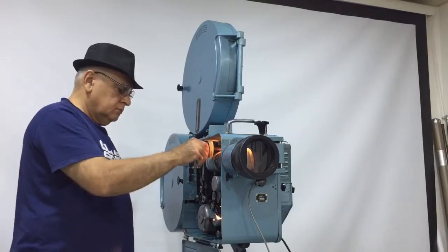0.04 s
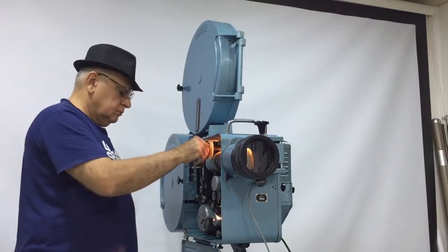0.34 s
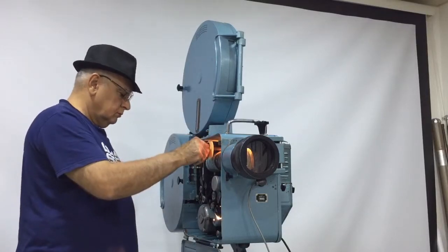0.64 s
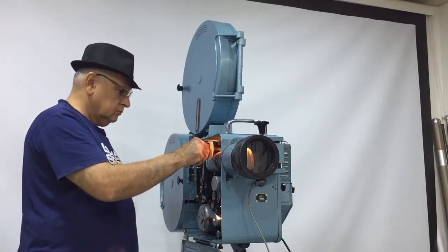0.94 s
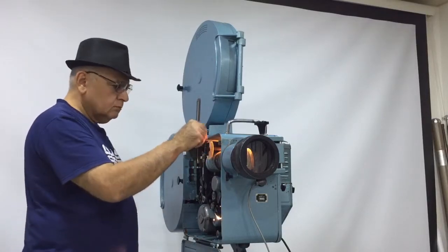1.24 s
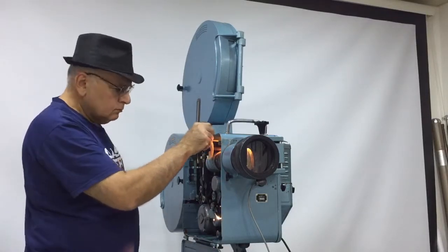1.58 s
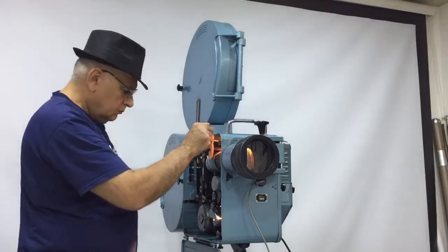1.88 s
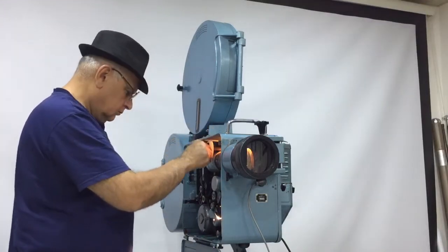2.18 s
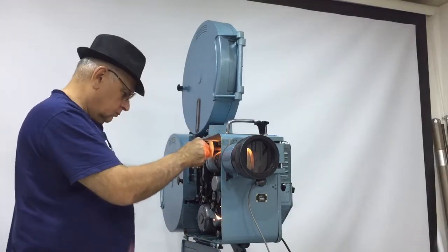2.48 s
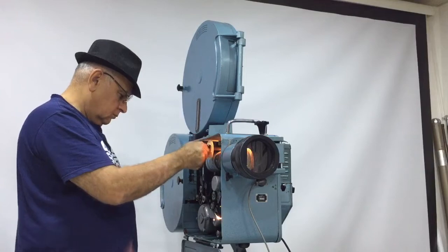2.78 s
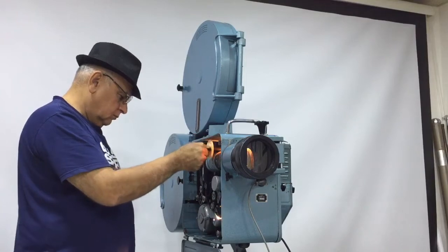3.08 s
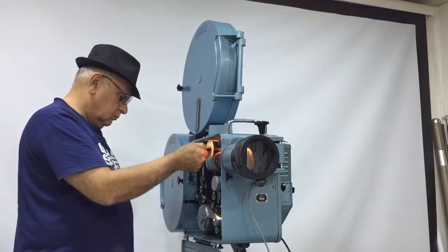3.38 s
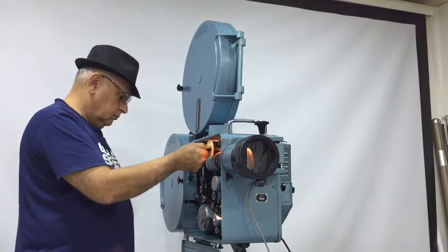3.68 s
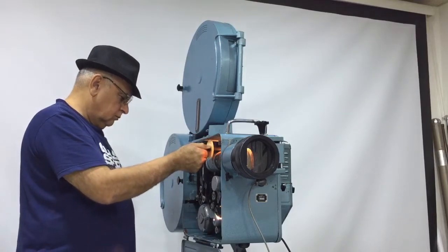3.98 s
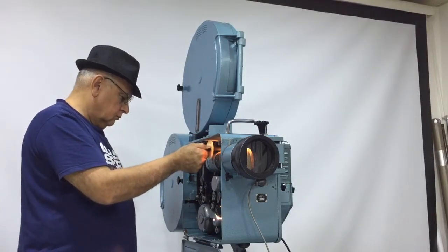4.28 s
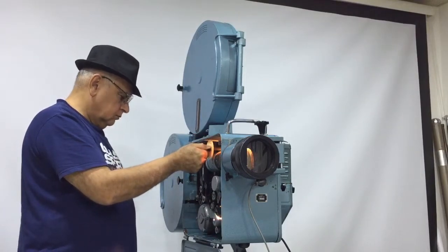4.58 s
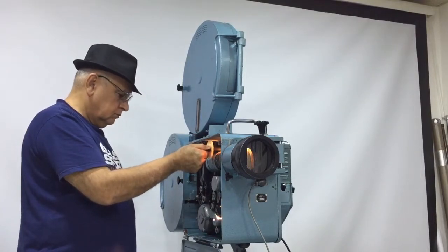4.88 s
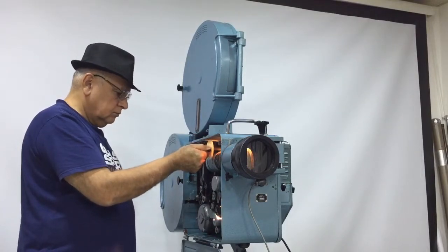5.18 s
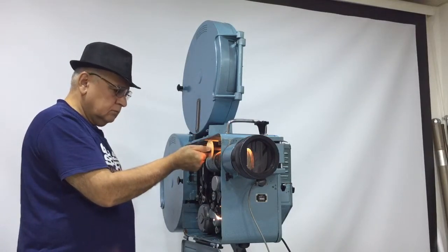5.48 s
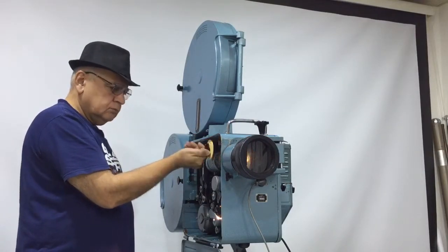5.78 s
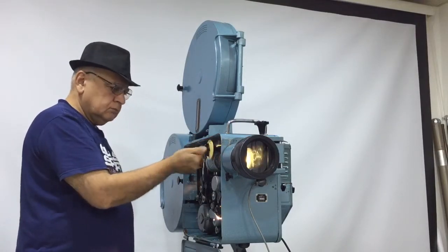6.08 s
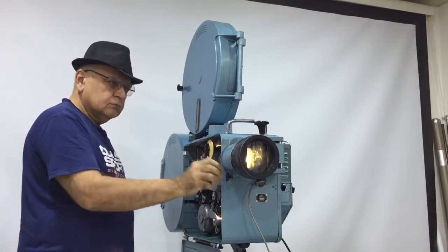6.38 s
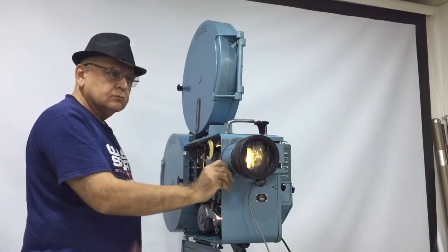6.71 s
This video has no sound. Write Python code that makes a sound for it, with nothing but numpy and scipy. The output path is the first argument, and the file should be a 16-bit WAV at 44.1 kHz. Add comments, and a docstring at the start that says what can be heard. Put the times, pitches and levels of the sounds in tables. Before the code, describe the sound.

A small hall is quiet, with faint electrical hum and a soft bump on the floor. About three seconds in, a large film projector switches on with a clunk and rattling metal covers. Its motor growls upward, the film snaps taut, and it settles into a steady gear whirr, rapid clatter and fan drone, heard from nearby. A lever scrapes and clicks as it runs.

```python
"""A soft bump on the floor sounds over the still air and faint mains hum of a small hall.
A large film projector is switched on: the impact rings its spring, the covers rattle, the stand booms.
The motor growls up to about 24 frames a second and the slack film snaps taut. Periodic impacts make the
running sound: gear teeth whirr and a claw pulls the film down once a frame, while the fan's blade tone
drones in its duct. A hand works a lever, which clicks and scrapes by friction along its guide."""
import sys
import numpy as np
from scipy import signal
from scipy.fft import rfft, irfft
from scipy.io import wavfile
from scipy.ndimage import uniform_filter1d

SR = 44100
rng = np.random.default_rng(int(sys.argv[2]) if len(sys.argv) > 2 else 0)


def transcribe(u):
    """Save the signal u as a 16-bit wav file named by the first command-line argument.

    u: samples, shape (n,) or (channels, n), limited to [-1, 1]; the rate is SR.
    q: integer samples, one column per channel.
    """
    v = np.clip(np.atleast_2d(u).T, -1, 1)
    q = np.round(v * 32767).astype(np.int16)
    wavfile.write(sys.argv[1], SR, q)


N = 302085
T = np.arange(N) / SR

# spectra of noises and struck bodies: frequency_hz, gain_db
AIR_SPECTRUM = [(18, -60), (30, -7), (103, -6.5), (153, -11), (280, -16), (404, -15.5), (844, -22),
                (988, -19.5), (1540, -23.5), (3580, -26.5), (10200, -34), (14800, -36.5), (16000, -51)]
FLOOR_SPECTRUM = [(30, -18), (50, 10.5), (65, -12), (90, 6), (130, 5.5), (200, 1.5), (280, -23), (420, -23),
                  (900, -50)]
SCRAPE_SPECTRUM = [(300, -24), (1000, 7), (1700, 2), (3200, 1), (4300, -0.5), (5200, -8.5), (8000, -16.5),
                   (16000, -52)]
LEVER_SPECTRUM = [(300, -6), (800, 3), (1500, -3), (2600, 5), (3500, 0), (4500, 2), (5400, -7), (7000, -6),
                  (10000, -13), (12500, -10), (16000, -12)]
SWITCH_SPECTRUM = [(200, -27), (700, -2), (1500, -0.5), (2800, -6), (3900, -3), (4450, -1), (4750, 6.5),
                   (5100, -6), (5500, -3), (6300, -8), (7500, -7), (11000, -12), (16000, -20)]
HOUSING_SPECTRUM = [(90, -10), (190, -2), (330, -0.5), (420, 1.5), (790, 4.5), (1000, 1), (1130, -5.5),
                    (1460, 5.5), (1800, -0.5), (2080, 3), (2470, -16), (2850, -11), (3220, -4.5),
                    (3640, -16), (4400, -13), (4800, -12), (6000, -19.5), (14000, -42)]
FILM_SPECTRUM = [(500, -19), (1500, -3), (2500, -1.5), (3300, -1), (4200, -2.5), (5000, -7.5), (5800, -1.5),
                 (7000, -6), (7800, -10.5), (8800, -9.5), (10300, -18), (11500, -13), (14000, -24),
                 (16000, -30)]
TEETH_SPECTRUM = [(150, -22.5), (400, -8), (530, -4.5), (572, -6.5), (610, 1.5), (680, 1), (745, -6.5),
                  (790, -0.5), (1080, -1.5), (1200, -6), (1550, -3.5), (1900, -15.5), (2500, -16),
                  (4000, -44.5)]
BEARING_SPECTRUM = [(60, -41), (130, -25.5), (200, -7.5), (245, -11.5), (300, 3), (360, -10), (470, -11),
                    (630, -1.5), (780, -5), (1050, -1), (1200, -10), (1500, -6), (2000, -12.5),
                    (4000, -33.5)]
GEARBOX_SPECTRUM = [(300, -34), (520, -6.5), (572, -8), (605, -2.5), (660, 2), (720, -3.5), (850, -24),
                    (1600, -39)]
SNAP_SPECTRUM = [(80, -22), (200, -3), (310, -18), (410, -1.5), (520, -4.5), (900, -9.5), (1800, -4),
                 (2300, -1.5), (2650, 2), (2950, -4.5), (3400, -1.5), (4150, -4), (4500, -5), (5300, -10.5),
                 (5900, -9), (6600, -8), (7100, -5.5), (7550, -12), (7900, -11), (9200, -13.5),
                 (10200, -20), (11500, -15), (16000, -23)]

# impacts: start_s, level_db, t60_s
STAND_JOLTS = [(.34, -45.5, 0.73), (2.93, -41, 0.83), (3.19, -39, 0.74), (3.63, -41.5, 0.51)]
FINGER_TOUCHES = [(1.4824, -61, .01), (2.2013, -64, 0.18), (2.255, -70, 0.2), (2.91, -60, 0.12)]  # on the housing
SWITCH_CLUNK = [(2.928, -20.5, 0.076)]
COVER_RATTLES = [(2.953, -25, 0.15), (2.978, -32, 0.087), (3.003, -25, 0.16), (3.033, -33.5, 0.15),
                 (3.06, -34.5, 0.3), (3.088, -33.5, 0.24), (3.116, -43, 0.08), (3.165, -45, 0.83)]
CATCH_PINGS = [(3.204, -46, 0.02), (3.344, -38, 0.04)]  # a small metal part, as the drive takes up its slack
GEARBOX_KNOCKS = [(3.565, -33.5, .07), (3.578, -31, 0.11)]  # as the load comes on
FILM_SNAPS = [(3.629, -24.5, 0.037), (3.6328, -13.5, 0.056), (3.641, -25.5, 0.35), (3.69, -36.5, 0.4)]
LEVER_CLICK = [(5.7515, -18.5, 0.068)]

# natural modes of metal parts: pitch_hz, level_db, t60_s
LEVER_MODES = [(4180, -11, .09), (4640, -16, .06), (4820, -16, .06), (7260, -18, .07)]
SPRING_MODES = [(4640, -7.5, 0.12), (4760, -9, 0.09), (4820, -11, 0.074), (5200, -12, 0.04)]
HOUSING_MODES = [(637, -5, 0.83), (780, -5, 0.51), (970, -3.5, 0.41), (1463, 1, 0.5), (1530, -4, 0.5),
                 (2006, 0, 0.41), (2107, -4, 0.42), (2170, -4, 0.44), (2990, -7, .4), (3120, -2, 0.31),
                 (3219, -1.5, 0.31), (3290, -3, 0.45), (3385, -4, 0.33), (4740, -20, 0.4), (5020, -21, .4)]
CATCH_MODES = [(3350, -13, .14), (3520, -10, .2), (3700, -8, .25), (4100, -6, 0.3)]
FILM_GUIDE_MODES = [(2310, -10, 0.25), (2370, -12.5, 0.18), (2520, -10, 0.22), (2630, -15, 0.25),
                    (3270, -7, 0.22), (3440, -11, 0.26), (7060, -17, .17), (7300, -18, .14),
                    (7570, -14, .14)]

# swells of grainy noise: peak_s, level_db, half_length_s
FILM_DRAGS = [(3.249, -42, 0.02), (3.382, -35, 0.018), (3.48, -34.5, 0.012), (3.561, -35.5, 0.015),
              (3.953, -29.5, 0.012)]  # the first slow strokes through the gate
RUN_UP_CHATTER = [(3.94, -36.5, 0.073), (4.1, -35, 0.21)]  # a midrange chatter swells as the drive nears full speed
LEVER_SCRAPES = [(4.98, -29.5, 0.049), (5.22, -31.5, 0.04), (5.86, -30, 0.057), (6.025, -29, 0.034),
                 (6.245, -27, 0.033), (6.517, -30.5, 0.018)]

# sustained tones: pitch_hz, level_db
MAINS_TONES = [(101.2, -77), (151.6, -66.5), (202.4, -76), (253, -87)]
GROWL_TONES = [(190, -51.5), (328, -52), (404, -50.5), (590, -49.5), (680, -48)]
PANEL_TONES = [(101.2, -63), (404, -47), (771, -43), (957, -50.5), (1038, -51), (1100, -45), (1471, -44.5),
               (3219, -71)]

# soft bumps on the floor and the stand: peak_s, level_db, change_per_pulse_db
BUMPS = [(.292, -45.5, -4.5), (5.82, -42, -4)]
# the claw touches, enters and seats: offset_frames, relative_amplitude
CLAW_CONTACTS = [(-.09, .55), (-.04, .7), (0, 1)]
# shafts that pulse the gear noise: beats_per_frame, depth_ratio, offset_beats
SHAFT_BEATS = [(1.75, .15, .2), (3, .33, .4), (5, .25, .7)]
# resonances of the fan's duct: centre_hz, width_hz, level_db
DUCT_RESONANCES = [(186, 31, -39.5), (225, 46, -44.5), (293, 47, -35)]
# brief dips and swells of the fan's drone: peak_s, change_db, half_length_s
DRONE_SWAYS = [(4.12, 4, .11), (5.863, -10, 0.1), (6.07, 5.5, 0.07)]
# meshing tones of the gears: cycles_per_frame, level_db
MESH_TONES = [(2, -49), (8, -48), (11, -44.5), (12, -38), (22, -42), (23, -43), (25, -35), (26, -37.5),
              (27, -39.5), (28, -40.5), (30, -40.5), (37, -41), (39, -44), (55, -45.5)]

START_S, GAIN_FPS_PER_S, RUN_FPS = 2.95, 22, 23.54
DRIVE_EASE_S, FAN_EASE_S = .05, .095  # the fan's belt slips, so it levels off later
ROOM_T60_S, ROOM_TREBLE_T60_S = 0.69, 0.15


def undb(db):
    """Amplitude ratio of a level in decibels."""
    return 10 ** (np.asarray(db) / 20)


def unit(x):
    """Normalisation to unit mean power."""
    return x / np.sqrt(np.mean(x ** 2))


def steady(x):
    """Normalisation to unit level over the last third, where the drive is up to speed."""
    return x / np.std(x[-N // 3:])


def fade(t, t60):
    """Damping: an exponential decay of 60 dB in t60 seconds."""
    return np.exp(-np.log(1000) * t / t60)


def bell(peak_s, half_length_s):
    """A Gaussian rise and fall."""
    return np.exp(-((T - peak_s) / half_length_s) ** 2)


def wander(rate_hz):
    """Smooth random fluctuation with a spread near 1."""
    step = int(SR / rate_hz)
    return unit(uniform_filter1d(np.repeat(rng.standard_normal(N // step + 1), step), step)[:N])


def colour(x, spectrum, size=8192):
    """Minimum-phase filtering imposes a spectrum at unit power gain."""
    hz, db = np.transpose(spectrum)
    log_hz = np.log(np.fft.rfftfreq(size, 1 / SR) + 1)
    gain = unit(undb(np.interp(log_hz, np.log(hz), db)))
    cepstrum = irfft(np.log(gain))
    cepstrum[1:size // 2] *= 2
    cepstrum[size // 2 + 1:] = 0
    return signal.fftconvolve(x, irfft(np.exp(rfft(cepstrum))))[:N]


def room(x, wet_db):
    """Reverberation: a diffuse tail, whose treble dies first, follows the direct sound."""
    t = T[:SR // 2]
    low = signal.sosfilt(signal.butter(2, 3500, fs=SR, output="sos"), rng.standard_normal(len(t)))
    high = signal.sosfilt(signal.butter(2, 3500, "high", fs=SR, output="sos"), rng.standard_normal(len(t)))
    tail = (low * fade(t, ROOM_T60_S) + high * fade(t, ROOM_TREBLE_T60_S)) * (t > .004)
    wet = signal.fftconvolve(x, tail / np.linalg.norm(tail))[:N]
    return (x + undb(wet_db) * wet) / np.hypot(1, undb(wet_db))


def blows(impacts):
    """Impact noise: each blow sets off a dense, decaying chatter of contacts."""
    envelope = sum(undb(db) * (T >= s) * fade(np.abs(T - s), t60) for s, db, t60 in impacts)
    return envelope * rng.standard_normal(N)


def swells(peaks):
    """Amplitude modulation: grainy noise rises and falls around each peak."""
    envelope = sum(undb(db) * bell(s, half_s) for s, db, half_s in peaks)
    return envelope * unit(undb(2 * wander(300)) * rng.standard_normal(N))


def ringing(impacts, modes):
    """Free vibration: every blow excites the same damped modes."""
    ring, t = np.zeros(N), T[:SR]
    for start_s, blow_db, _ in impacts:
        start = int(start_s * SR)
        tones = sum(undb(blow_db + db) * fade(t, t60) * np.sin(2 * np.pi * (hz * t + rng.random()))
                    for hz, db, t60 in modes)
        ring[start:start + SR] += tones[:N - start]
    return ring


def contacts(turns, offsets, sizes, scatter_db, jitter_s):
    """A quasi-periodic impulse train: clicks at set points of each turn, scattered in size and time."""
    at_turns = (np.arange(np.floor(turns[0]), turns[-1])[:, None] + offsets).ravel()
    chance = rng.standard_normal((len(at_turns), 2))
    size = np.resize(sizes, len(at_turns)) * undb(scatter_db * chance[:, 0])
    index = (np.interp(at_turns, turns, T) + jitter_s * chance[:, 1]) * SR
    inside = (at_turns > turns[0]) & (at_turns < turns[-1])
    return np.bincount(np.clip(index[inside], 0, N - 1).astype(int), size[inside], N)


def frame_rate(ease_s, sag_fps=.25):
    """Uniform acceleration eases into a running rate, which sags as the lever drags on the drive."""
    full_speed_s = START_S + RUN_FPS / GAIN_FPS_PER_S
    remaining_s = ease_s * np.logaddexp(0, (full_speed_s - T) / ease_s)
    return np.maximum(RUN_FPS - GAIN_FPS_PER_S * remaining_s - sag_fps * bell(5.76, .12), 0)


def air_and_hum(air_db=-67.5):
    """Ambient noise: broadband air lies under faint harmonics of the mains."""
    hum = sum(undb(db + wander(4.65)) * np.sqrt(2) * np.sin(2 * np.pi * (hz * T + rng.random()))
              for hz, db in MAINS_TONES)
    return hum + undb(air_db + 0.25 * wander(2.3)) * colour(rng.standard_normal(N), AIR_SPECTRUM)


def bumps(count=7, pulse_s=0.0493, half_length_s=0.028):
    """Exponential decay: each soft bump rumbles on in even, fading pulses."""
    pulses = [(s + k * pulse_s, db + k * step_db, half_length_s)
              for s, db, step_db in BUMPS for k in range(count)]
    return room(colour(swells(pulses), FLOOR_SPECTRUM), wet_db=-7)


def stand(speed, pitch_hz=57, rise_s=0.13):
    """Resonance: one low mode of the stand booms after each jolt and shakes while the motor runs."""
    swing = sum(undb(db) * fade(np.abs(T - s), t60) * np.clip((T - s) / rise_s, 0, 1)
                for s, db, t60 in STAND_JOLTS)
    shake = undb(-72 + 2 * wander(4.7)) * speed
    return (2 * swing + shake) * np.sin(2 * np.pi * pitch_hz * T + 0.16 * wander(8))


def hand():
    """Impact and friction: fingers tap the housing; the lever scrapes, unlatches and rings."""
    rubbing = colour(swells(LEVER_SCRAPES) + blows(FINGER_TOUCHES), SCRAPE_SPECTRUM)
    click = colour(blows(LEVER_CLICK), LEVER_SPECTRUM)
    return room(rubbing + click, wet_db=-3.5) + ringing(LEVER_CLICK, LEVER_MODES)


def switch():
    """Impulsive excitation: the switch clunks and its spring rings briefly."""
    clunk = colour(blows(SWITCH_CLUNK), SWITCH_SPECTRUM)
    return room(clunk, wet_db=0) + ringing(SWITCH_CLUNK, SPRING_MODES)


def motor_growl(speed):
    """Vibration under load: the motor's rough tones fade as it nears full speed."""
    tones = sum(undb(db + 3.6 * wander(18)) * np.sin(2 * np.pi * hz * T + 1.6 * wander(40))
                for hz, db in GROWL_TONES)
    return tones * (T > START_S) * (1 - speed ** 6)


def covers():
    """Repeated impact: the starting jolt rattles the loose metal covers and excites their modes."""
    rattle = colour(blows(COVER_RATTLES), HOUSING_SPECTRUM)
    return room(rattle, wet_db=-7.5) + undb(-14) * ringing(COVER_RATTLES, HOUSING_MODES)


def claw(frames, lag_s=.0023, t60_s=.007):
    """Periodic impact: the claw strikes three times a frame, each a heavily damped burst of noise."""
    strikes = contacts(frames, *np.transpose(CLAW_CONTACTS), scatter_db=1.8, jitter_s=.0004)
    t = T[:SR // 20]
    envelope = signal.fftconvolve(strikes, (t > lag_s) * fade(t, t60_s))[:N]
    return steady(envelope * rng.standard_normal(N) * undb(2.5 * wander(4000)))


def film_transport(frames, speed, full_speed_db=-32.5):
    """Intermittent motion: once a frame the clawed film slides and its loop flaps; sprockets tick."""
    phase = frames % 1
    stroke_size = undb(1.3 * rng.standard_normal(256))[np.floor(frames).astype(int)]
    jerk = np.exp(-phase / .36) + .2 * np.exp(-phase / .06) + .36 * np.exp(-((phase - .45) / .17) ** 2)
    flap = steady(stroke_size * jerk * rng.standard_normal(N) * undb(0.6 * wander(700)))
    ticks = steady(contacts(frames, np.arange(8) / 8, np.ones(8), scatter_db=2, jitter_s=.0015))
    clicks = undb(-6) * claw(frames) * speed
    slide = undb(-5) * rng.standard_normal(N) * speed
    clatter = room(flap + undb(-5) * ticks + slide, wet_db=-1.5) + clicks
    gain = undb(full_speed_db + 0.048 * wander(11)) * speed ** 1.49
    return steady(colour(clatter, FILM_SPECTRUM)) * gain


def gears(frames, speed, tooth_count=64, gain_db=-27, crawl_change_db=-30.5):
    """Amplitude modulation: shafts pulse the tooth impacts and bearing rush, over a knocking gearbox."""
    # each tooth strikes much as on the last frame, with a part that repeats every fourth frame
    drifting = unit(uniform_filter1d(rng.standard_normal((128, tooth_count)), size=2, axis=0))
    repeating = np.tile(rng.standard_normal((4, tooth_count)), (32, 1))
    offsets = (np.arange(tooth_count) + rng.random(tooth_count)) / tooth_count
    strikes = contacts(frames, offsets, drifting + undb(-7) * repeating, scatter_db=1, jitter_s=0.00005)
    teeth = steady(colour(room(strikes, wet_db=-1.5), TEETH_SPECTRUM)) / np.sqrt(np.maximum(speed, .3))
    bearings = colour(rng.standard_normal(N), BEARING_SPECTRUM)
    throb = 1 + sum(depth * np.cos(2 * np.pi * (beats * frames - offset))
                    for beats, depth, offset in SHAFT_BEATS)
    knocks = contacts(1.75 * frames, np.zeros(1), np.ones(1), scatter_db=2, jitter_s=.001)
    gearbox = steady(colour(room(knocks, wet_db=-3.5), GEARBOX_SPECTRUM))
    whirr = (undb(-3.5) * teeth + undb(-6) * bearings) * throb + undb(-9.5) * gearbox
    onset = np.clip((T - 3.05) / 0.21, 0, 1)
    return whirr * onset * undb(gain_db + crawl_change_db * (1 - speed))


def run_up():
    """Transients: a catch pings, the gearbox knocks, the film drags and snaps taut; a chatter swells."""
    snaps = colour(blows(FILM_SNAPS + CATCH_PINGS) + swells(FILM_DRAGS), SNAP_SPECTRUM)
    knocks = colour(blows(GEARBOX_KNOCKS), GEARBOX_SPECTRUM)
    chatter = colour(swells(RUN_UP_CHATTER), SCRAPE_SPECTRUM)
    metal = undb(-1.5) * ringing(FILM_SNAPS, FILM_GUIDE_MODES) + ringing(CATCH_PINGS, CATCH_MODES)
    return room(snaps + knocks + chatter, wet_db=-5) + metal


def whine(frames, speed):
    """Forced vibration: panels sing with the motor; gears mesh at harmonics of the frame rate."""
    mesh = sum(undb(db + 1.05 * wander(3.02))
               * np.sin(2 * np.pi * (harmonic * frames + rng.random()) + 0.075 * wander(4.3))
               for harmonic, db in MESH_TONES)
    panels = sum(undb(db + wander(5.6)) * np.sin(2 * np.pi * hz * T + 0.33 * wander(12))
                 for hz, db in PANEL_TONES)
    return mesh * speed ** 18 + panels * speed ** 2


def fan(rate_fps, blades_per_frame=12.87):
    """Duct resonance: the rising blade tone booms at each peak it passes; its octave joins near the top."""
    speed, blade_hz = rate_fps / RUN_FPS, blades_per_frame * rate_fps
    duct_gain = sum(undb(db) / (1 + (2 * (blade_hz - hz) / width) ** 10) ** .5
                    for hz, width, db in DUCT_RESONANCES)
    # turbulence jostles the phase: quickly at a crawl, slowly and widely at full speed
    jostle_rad = (.12 + .5 * speed ** 120) * wander(16) + .3 * (1 - speed) * wander(120)
    angle = 2 * np.pi * np.cumsum(blade_hz) / SR
    octave = undb(-42.5) * speed ** 16 * np.sin(2 * angle + .3 * wander(8))
    sway_db = sum(db * bell(s, half_s) for s, db, half_s in DRONE_SWAYS) + 1.5 * wander(14)
    return np.sin(angle + jostle_rad) * duct_gain * undb(sway_db) * (speed > 0) + octave


def scene():
    """Superposition: parts that follow the drive's speed add to the single blows and the background."""
    rate_fps = frame_rate(DRIVE_EASE_S)
    speed = rate_fps / RUN_FPS
    frames = np.cumsum(rate_fps) / SR
    drive = gears(frames, speed) + whine(frames, speed) + film_transport(frames, speed)
    drone = fan(frame_rate(FAN_EASE_S)) + motor_growl(speed)
    transients = covers() + switch() + hand() + run_up() + bumps()
    return (drive + drone + transients + stand(speed) + air_and_hum())[None]


def record(dry, low_hz=36, top_hz=15900):
    """Band limiting: filters cut the deepest rumble and, steeply, the highest treble."""
    thinned = signal.sosfilt(signal.butter(4, low_hz, "high", fs=SR, output="sos"), dry)
    return signal.sosfilt(signal.ellip(10, .2, 80, top_hz, fs=SR, output="sos"), thinned)


dry = scene()
out = record(dry)
transcribe(out)
```